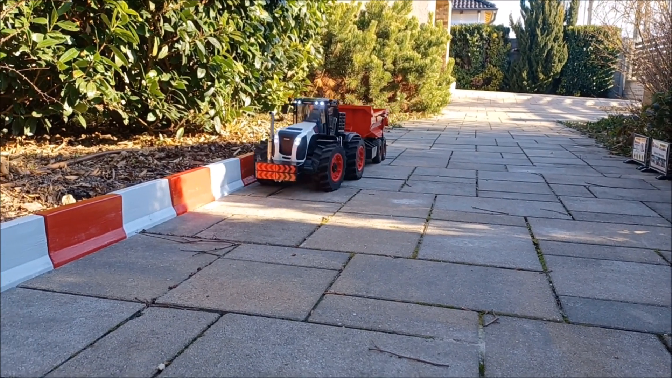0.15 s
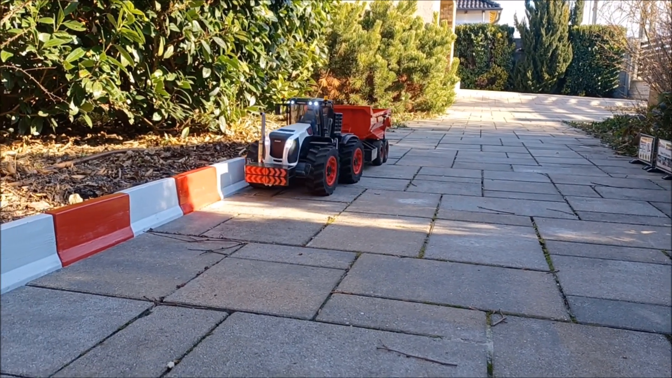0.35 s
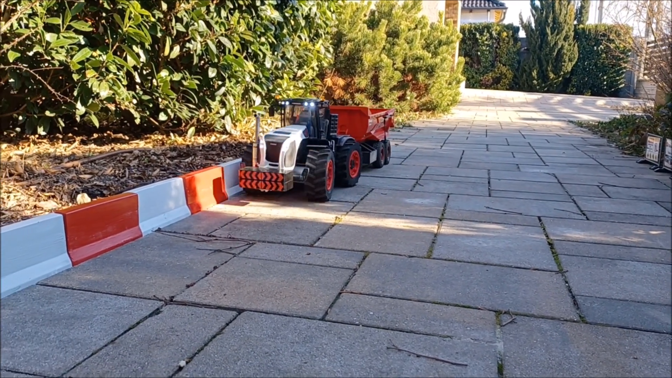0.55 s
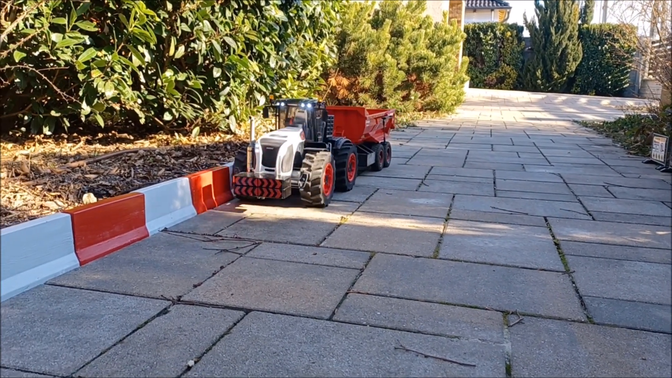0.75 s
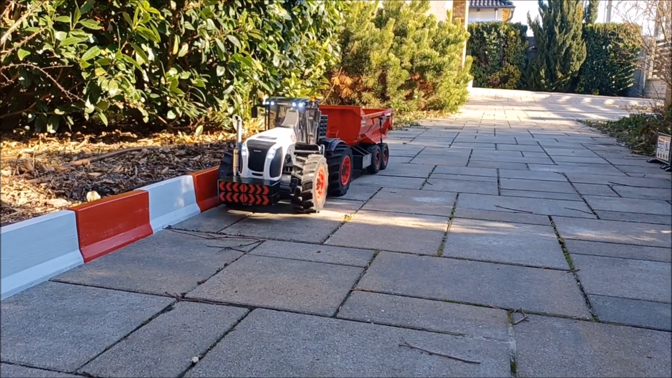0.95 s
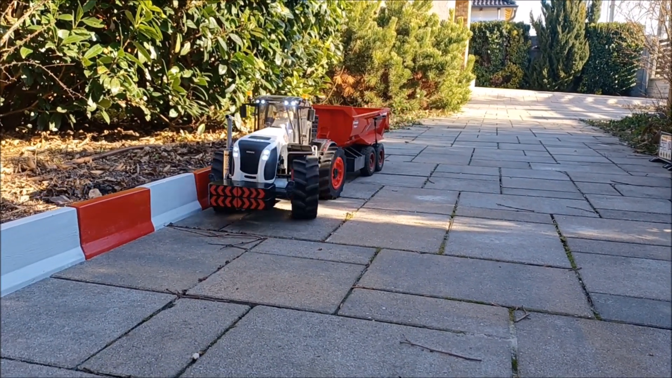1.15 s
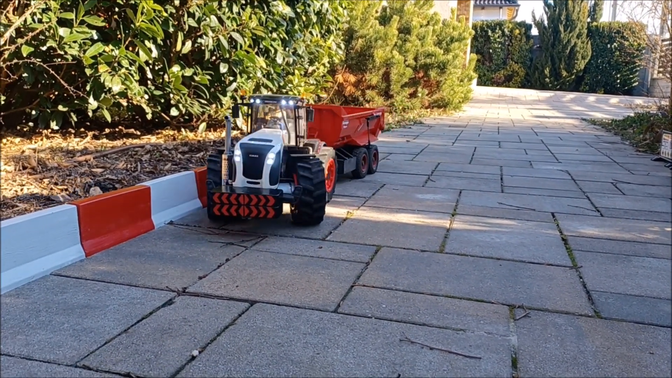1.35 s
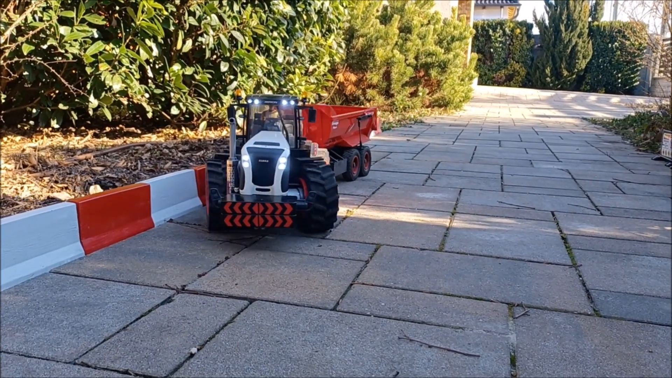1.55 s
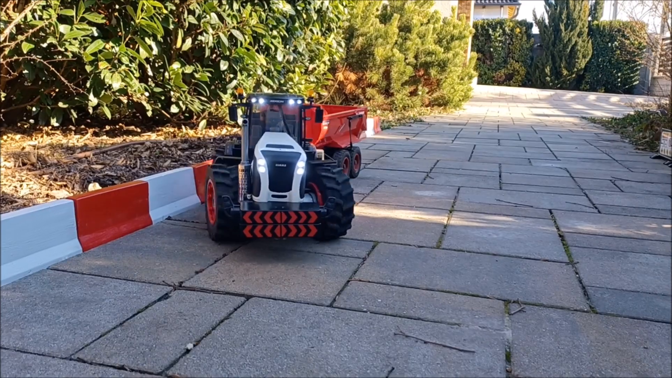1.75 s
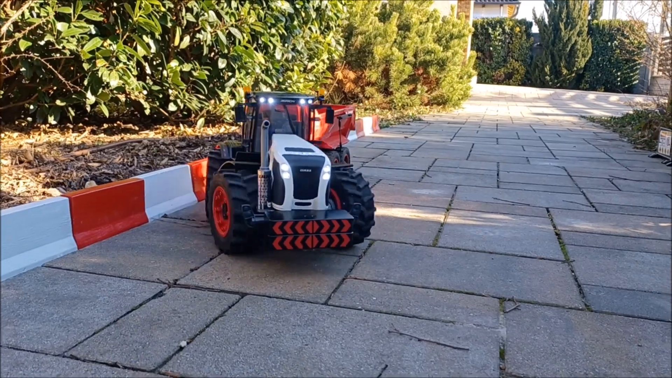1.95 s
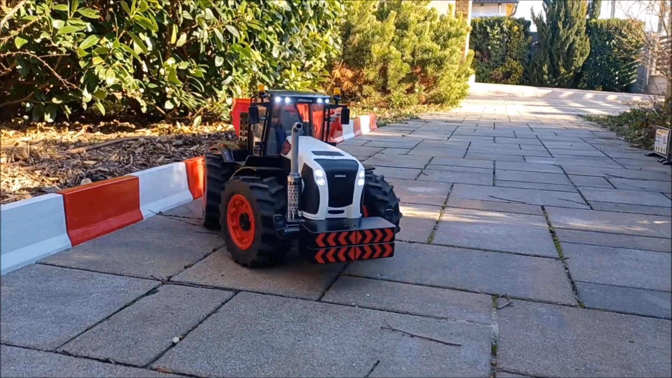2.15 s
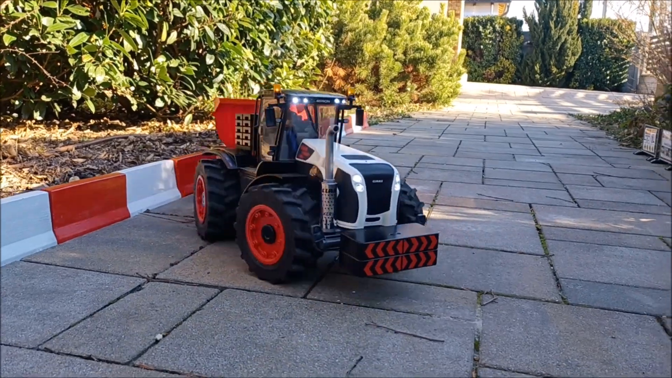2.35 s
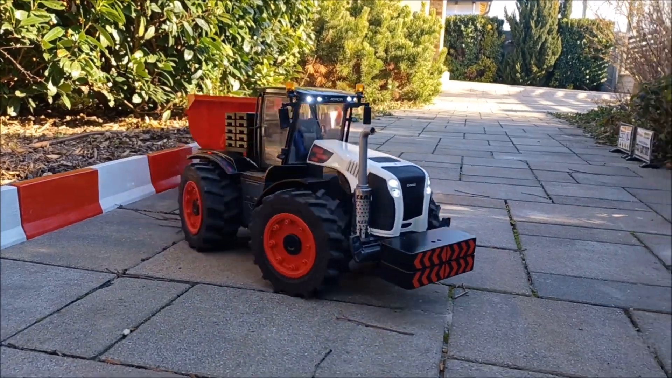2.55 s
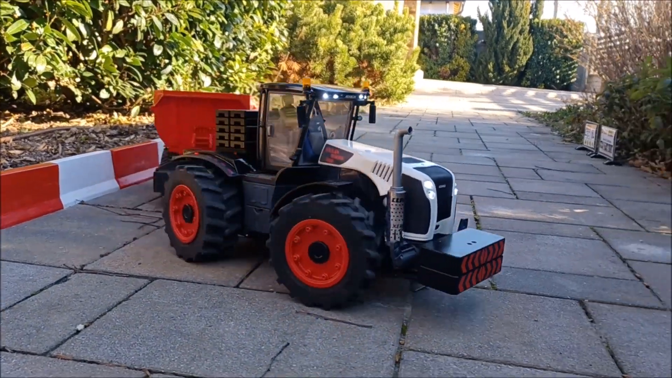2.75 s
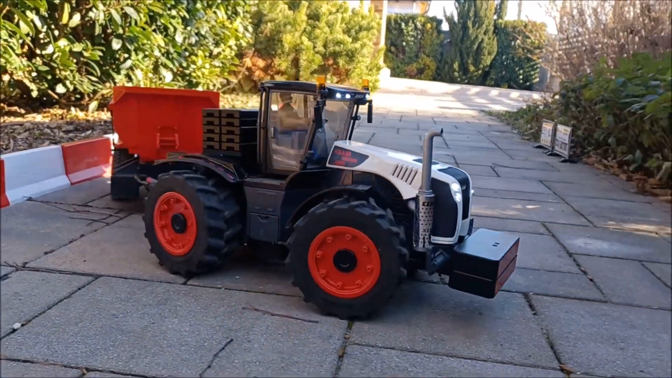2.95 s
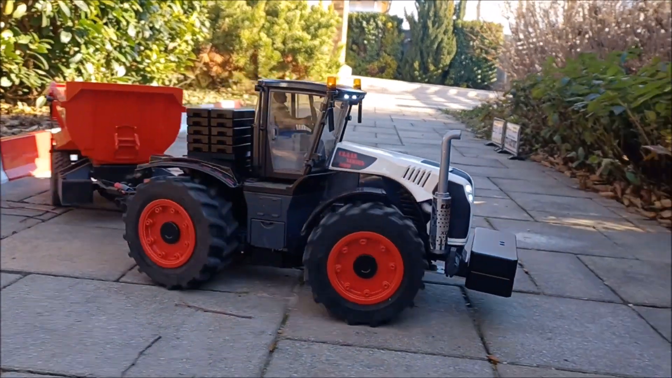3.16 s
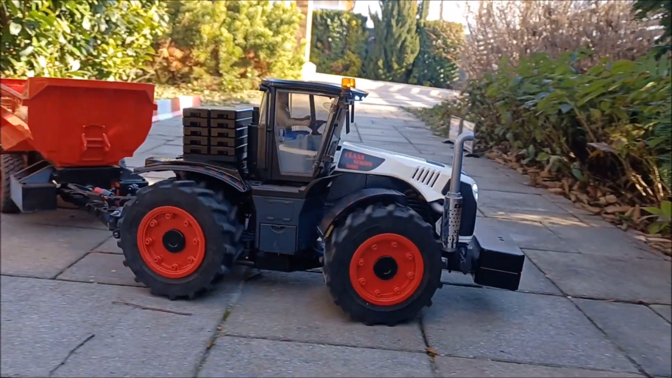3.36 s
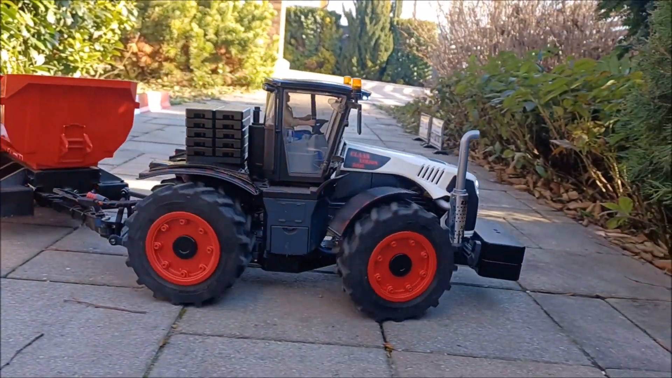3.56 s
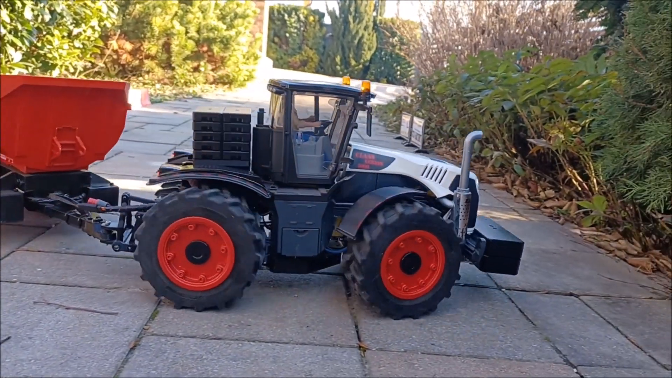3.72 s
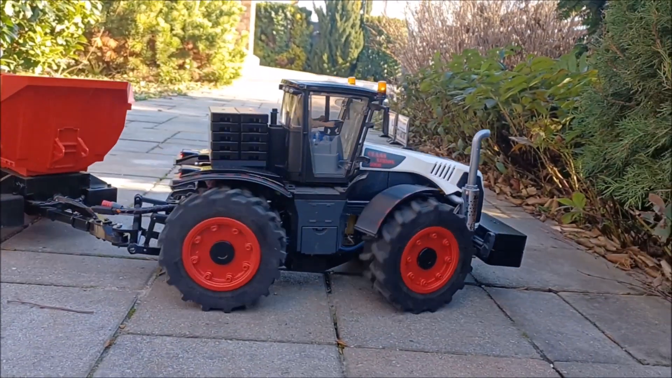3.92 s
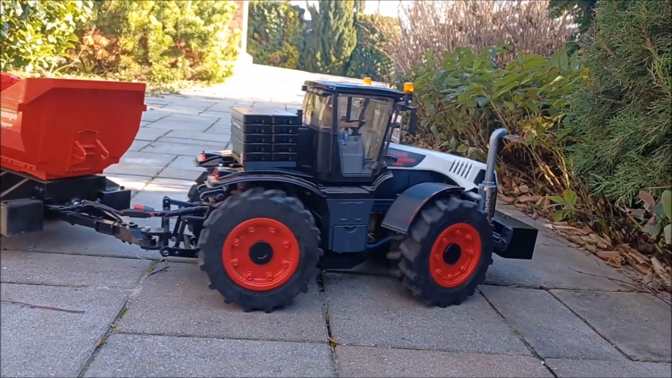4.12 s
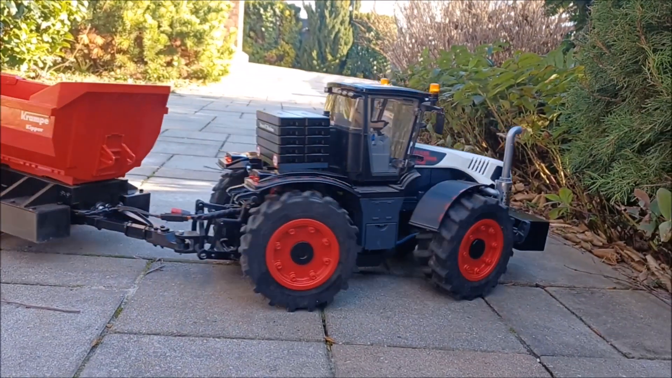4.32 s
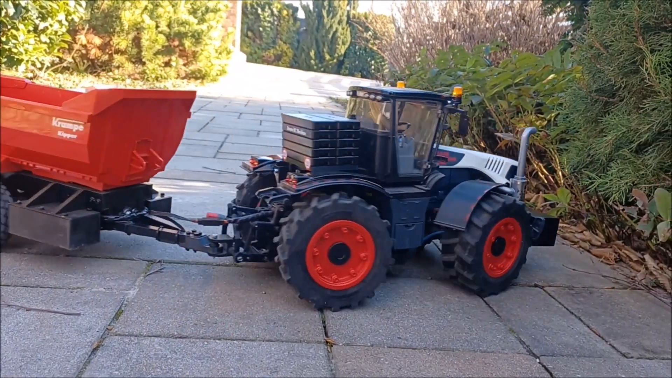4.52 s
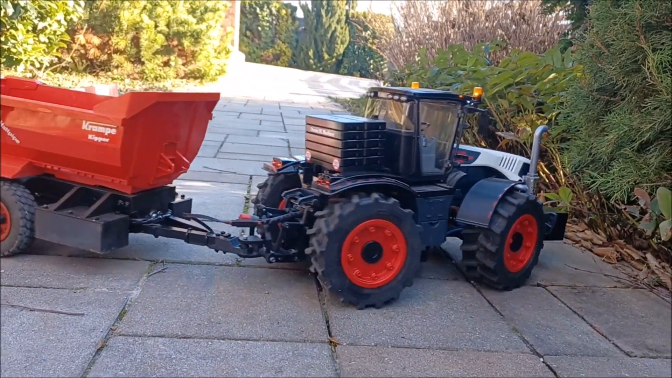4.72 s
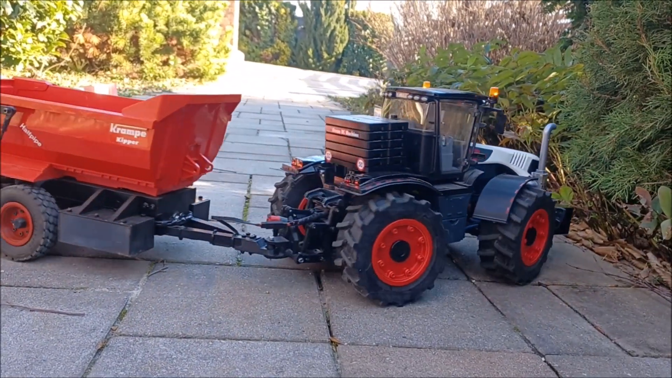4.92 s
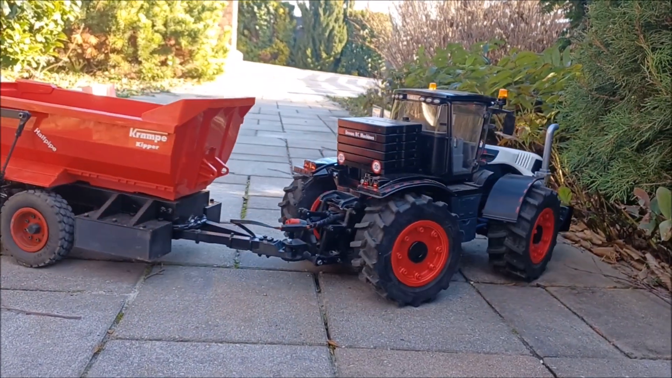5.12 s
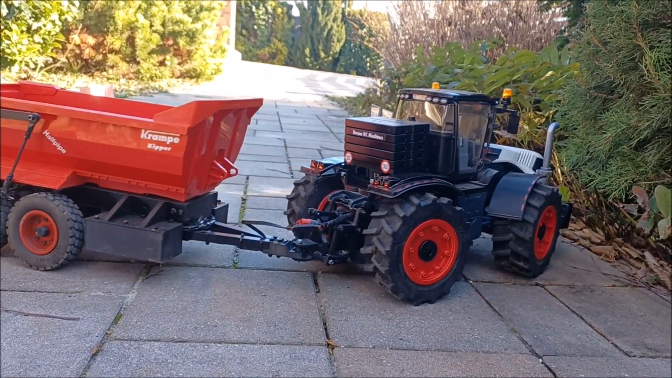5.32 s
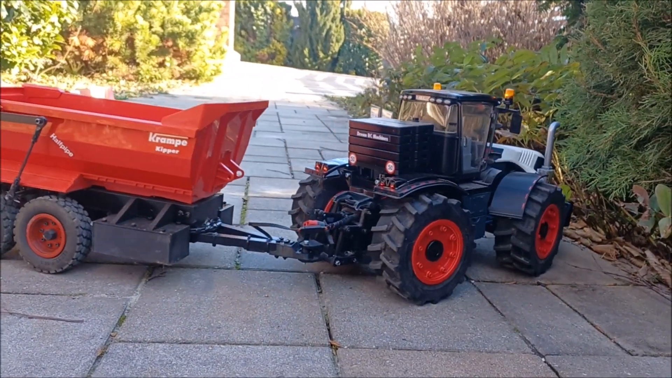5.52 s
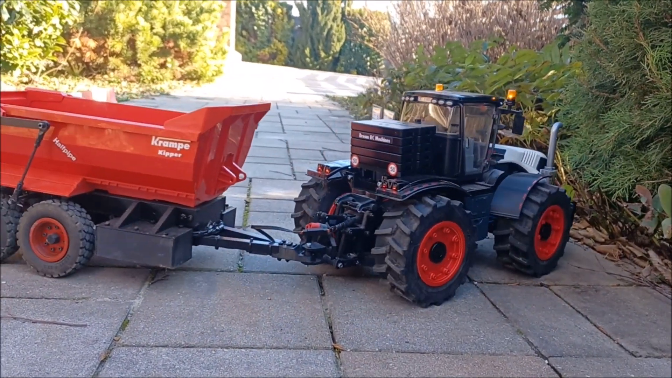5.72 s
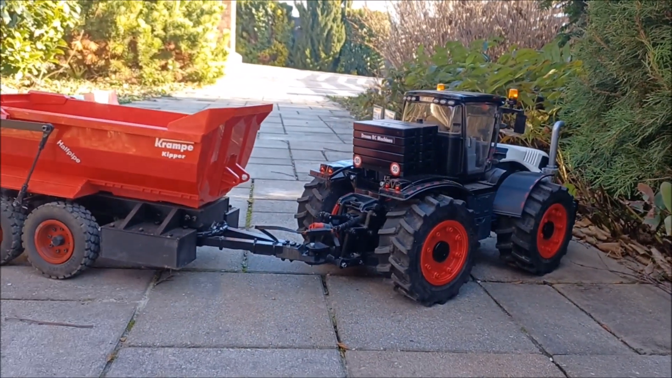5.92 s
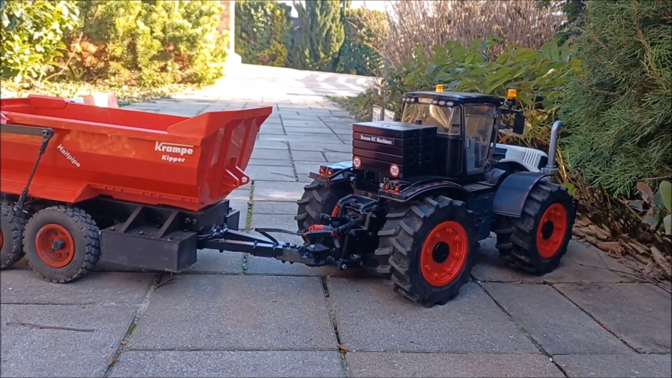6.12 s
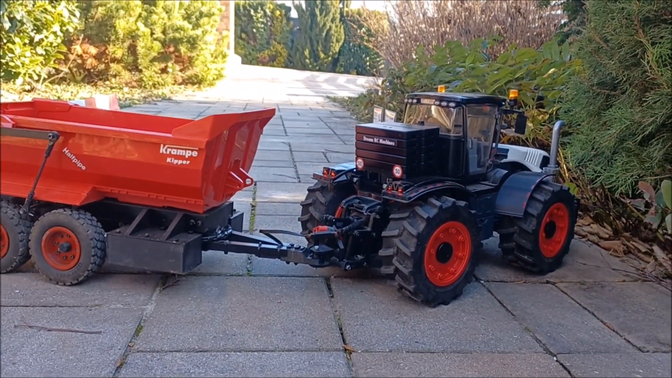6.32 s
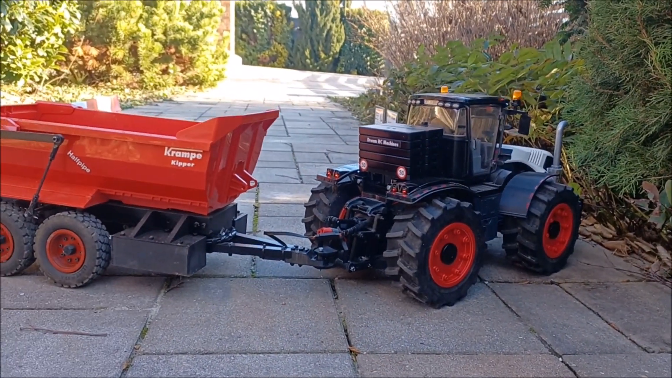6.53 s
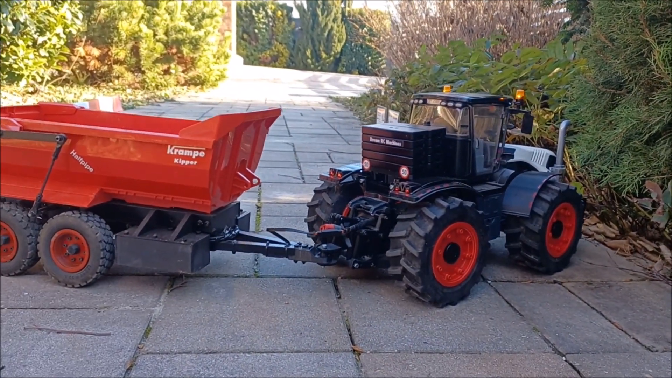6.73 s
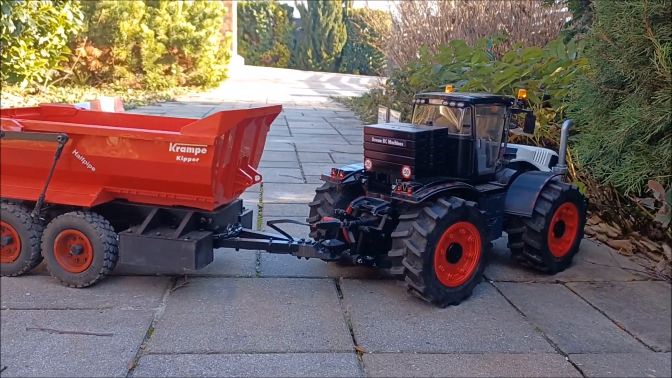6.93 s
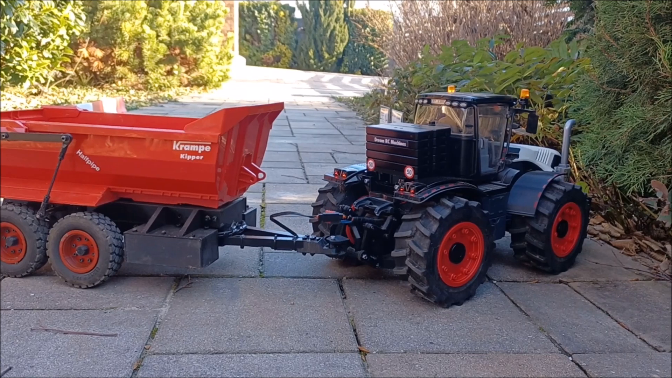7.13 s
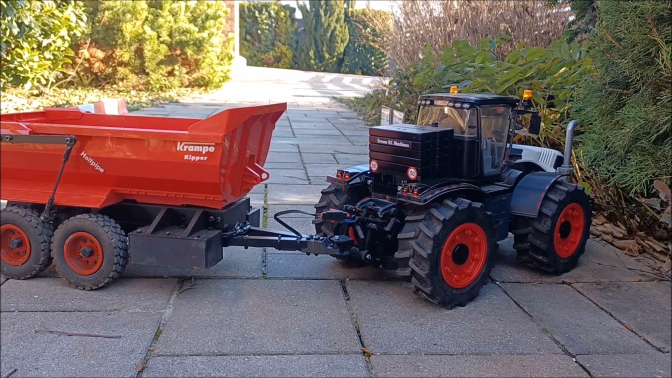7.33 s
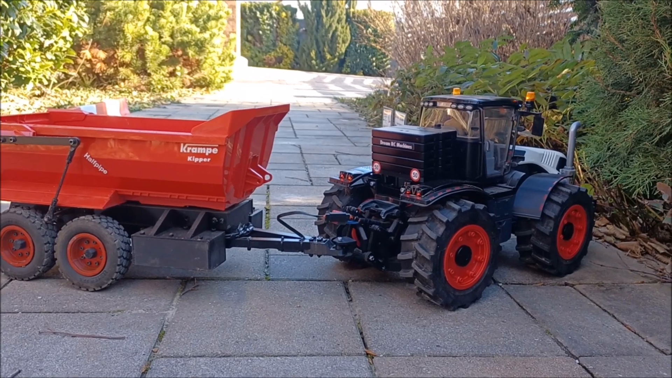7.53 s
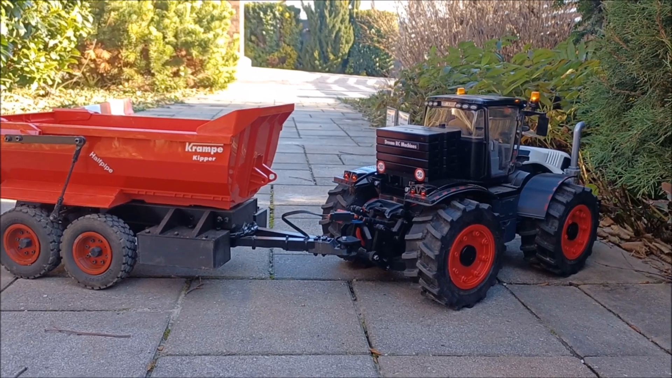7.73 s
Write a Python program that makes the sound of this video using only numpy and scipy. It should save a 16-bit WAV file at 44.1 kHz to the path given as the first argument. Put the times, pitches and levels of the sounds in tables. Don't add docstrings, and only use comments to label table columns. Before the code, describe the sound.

Close view of a small electric tractor: a bright, fluttering gear whine around three kilohertz and dry tooth rattle, swelling as it nears. From about three seconds it slows, pitch sliding down in steps, sand crackling sharply under the tyres. Slack hitch pins clack and the camera body is bumped in the hand. The gears creep briefly, a tiny servo whirs in short pushes, and only low distant traffic remains.

```python
import sys
import numpy as np
from scipy import signal
from scipy.fft import rfft, irfft, next_fast_len
from scipy.io import wavfile
from scipy.ndimage import uniform_filter1d, map_coordinates

SR = 44100
rng = np.random.default_rng(int(sys.argv[2]) if len(sys.argv) > 2 else 0)


def generate_wav(sig):
    pcm = np.round(np.clip(np.atleast_2d(sig).T, -1, 1) * 32767).astype(np.int16)
    wavfile.write(sys.argv[1], SR, pcm)


def invert_db(level):
    return 10 ** (np.asarray(level, dtype=float) / 20)


N = 342951

# time in seconds, front tooth rate in Hz.
FRONT_SPEED = [(0, 1650), (1.19, 1630), (1.225, 1603), (1.24, 1560), (1.275, 1534), (1.41, 1530),
               (1.45, 1520), (1.7, 1507), (1.92, 1514), (2.03, 1530), (2.08, 1511), (2.25, 1513),
               (2.3, 1530), (2.36, 1503), (2.43, 1530), (2.51, 1519), (2.64, 1523), (2.71, 1489),
               (2.8, 1496), (2.86, 1520), (3.12, 1510), (3.17, 1535), (3.215, 1515), (3.245, 1450),
               (3.29, 1388), (3.33, 1348), (3.365, 1235), (3.44, 1131), (3.5, 1062), (3.6, 912),
               (3.64, 850), (3.69, 815), (3.76, 772), (3.84, 788), (3.9, 762), (3.96, 786), (4.01, 775),
               (4.08, 797), (4.14, 770), (4.22, 793), (4.36, 790), (4.42, 708), (4.49, 697), (4.53, 650),
               (4.575, 595), (4.65, 588), (4.7, 562), (4.85, 567), (4.9, 550), (4.99, 503), (5.07, 425),
               (5.4, 378)]


def unit(x):
    return x / np.sqrt(np.mean(x ** 2) + 1e-20)


def along(points, hz):
    f, v = np.transpose(points)
    return np.interp(np.log(hz + 1), np.log(f + 1), v)


def curves(rows, outside=None):
    s, *cols = np.transpose(rows)
    return [np.interp(np.arange(N) / SR, s, c, outside, outside) for c in cols]


def bumps(rows):
    t = np.arange(N) / SR
    return sum(db * np.exp(-((t - s) / half) ** 2) for s, db, half in rows)


def wobble(rate, channels=1):
    at = [np.arange(N) * rate / SR]
    knots = rng.standard_normal((channels, int(N * rate / SR) + 4))
    return np.array([map_coordinates(k, at, order=1) for k in knots])


def filtered(x, response):
    m = next_fast_len(N + 8192)
    return irfft(rfft(x, m) * response(np.fft.rfftfreq(m, 1 / SR)), m)[..., :N]


def resonances(peaks, hz):
    return sum(db / (1 + ((hz - centre) / width) ** 2) for centre, width, db in peaks)


def coloured(spectrum):
    return lambda hz: invert_db(along(spectrum, hz))


def peaked(spectrum, peaks):
    return lambda hz: invert_db(along(spectrum, hz) + resonances(peaks, hz))


def rush(gain, patchy_db):
    # frequency in Hz, left-right likeness from 0 to 1.
    likeness = [(100, 0.67), (900, 0.71), (1500, 0.18), (2500, 0.074)]
    z = signal.stft(rng.standard_normal((2, N)), nperseg=512)[2]
    field = uniform_filter1d(rng.standard_normal(z.shape[1:]), size=4, axis=0)
    field = uniform_filter1d(field, size=8, axis=1)
    pair = signal.istft(z * invert_db(patchy_db * unit(field)), nperseg=512)[1][:, :N]
    angle = lambda hz: np.arccos(np.clip(along(likeness, hz), -1, 1)) / 2
    mid, side = filtered(pair, lambda hz: gain(hz) * [np.cos(angle(hz)), np.sin(angle(hz))])
    return unit(np.array([mid + side, mid - side]))


def background():
    # frequency in Hz, density in dB per Hz.
    hum_colour = [(15, -73), (25, -33), (107, -2), (140, -5.5), (432, -16.5), (580, -20), (719, -12.5),
                  (916, -17.5), (1170, -20), (1750, -23.5), (2000, -28), (3000, -33), (7000, -38),
                  (13800, -41), (15400, -21)]
    # frequency in Hz, level in dB rms.
    whistle_lines = [(15633, -82), (15676, -79)]
    # nearest time in seconds, half length in seconds, dB over the hum.
    tyre_roll = (2.9, 1.8, 7.4)
    # time in seconds, half length in seconds, dB over the hum.
    hand_shifts = [
        (5.518, 0.099, 13.5),
        (5.922, 0.18, 15),
    ]
    t = np.arange(N) / SR
    whistle = np.zeros((2, N))
    for hz, db in whistle_lines:
        phase = rng.uniform(0, 6, (2, 1))
        whistle += invert_db(db + 4 + wobble(8, channels=2)) * np.sin(2 * np.pi * hz * t + phase)
    swells_db = bumps([(s, db, half) for s, half, db in (tyre_roll, *hand_shifts)])
    hum_db = -71.5 + swells_db + wobble(11.0)
    return invert_db(hum_db) * rush(coloured(hum_colour), patchy_db=1.5) + whistle


def knocks():
    # time in seconds, peak in dB, pitch in Hz, left minus right in dB.
    shell_bumps = [(0.17, -46.5, 116.7, -10), (0.668, -50, 432, -10), (0.681, -44.5, 108, -6),
                   (0.837, -47.5, 290, -9), (0.922, -45.5, 286, -6), (1.051, -56.5, 658, -2),
                   (1.141, -46.5, 540, -7), (5.372, -52, 278, -12), (5.431, -48.5, 494, -12),
                   (5.452, -49, 200, -17), (5.483, -45, 252, -19), (5.56, -55, 297, -4),
                   (5.842, -54, 220, -14), (5.5, -35.5, 232, -18), (5.519, -36, 220, -8),
                   (5.529, -35, 290, -11), (5.538, -37, 270, -11), (5.781, -49, 161, -24),
                   (5.81, -48, 644, -13), (5.872, -42, 238, -26), (5.883, -47, 380, 16.5),
                   (5.893, -44, 484, -6), (5.92, -34, 195, -20), (5.9315, -22.5, 180, 30),
                   (5.932, -23.5, 160, -15), (5.944, -31, 190, -10), (5.89, -33.5, 104, -10),
                   (7.43, -54, 94, -5), (5.991, -53, 194, -15), (6.376, -55.5, 140, -12),
                   (6.46, -56.5, 197, -25), (6.5, -55.5, 262, -13), (7.412, -62.5, 236, -17),
                   (7.47, -71, 197, -9)]
    soft_t60_s, pitch_damps = 0.091, .35
    grip_db = 29
    out, t = np.zeros((2, N + SR)), np.arange(SR // 4) / SR
    for s, db, hz, pan_db in shell_bumps:
        t60 = soft_t60_s * 2 ** (-(db + 50.5) / grip_db) * (250 / hz) ** pitch_damps
        phase = rng.uniform(0, 1.1, (3, 2, 1))
        modes = zip((.55, 1, 1.6), (.4, 1, .25), phase)
        body = sum(g * np.sin(2 * np.pi * k * hz * t + p) for k, g, p in modes)
        rise = np.sin(np.pi / 2 * np.minimum(t * hz / 0.47, 1)) ** 2
        shade_db = np.minimum([[pan_db], [-pan_db]], 0)
        out[:, round(s * SR):][:, :len(t)] += invert_db(db + 10.0 - 60 * t / t60 + shade_db) * rise * body
    return filtered(out[:, :N], lambda hz: (1j * hz / (70 + 1j * hz)) ** 4)


def grit():
    # time in seconds, peak in dB, length in seconds.
    ticks = [(.82, -49.5, .022), (.9, -53.5, .022), (3.54, -40, .07), (3.636, -38, .07), (3.725, -41, .045),
             (3.8082, -39, .022), (3.9664, -46, .04), (4.188, -37, .055), (4.245, -46, .04),
             (4.3582, -42, .04), (4.4443, -42, .02), (4.5772, -33, .022), (4.657, -32.5, .022),
             (4.6694, -34.5, .022), (4.683, -42, .018), (4.745, -39, .018), (4.8332, -42.5, .018),
             (4.9199, -33, .022)]
    # frequency in Hz, density in dB per Hz.
    grit_colour = [(1800, -17.5), (4000, 8), (6500, 4.5), (8500, -8), (11000, 5), (15800, -5)]
    envelope, t = np.zeros(N + SR), np.arange(SR // 10) / SR
    for s, db, length in ticks:
        fall = invert_db(db - 3.0 - 60 * (t / length) ** 2)
        envelope[round(s * SR):][:len(t)] += fall * (1 - np.exp(-t / 0.0013))
    return envelope[:N] * rush(coloured(grit_colour), patchy_db=1.2)


def hitch():
    # time in seconds, peak in dB, resonance in Hz, left minus right in dB.
    clacks = [(5.351, -30.5, 3900, 1), (5.428, -28.5, 3000, -3), (5.4269, -36, 1230, -16),
              (5.7762, -35, 2920, -4), (5.811, -26.5, 2040, -3), (5.8383, -34.5, 4310, -10.5),
              (5.8564, -36, 4550, -15), (5.8829, -30, 2510, -2.5), (5.8882, -24.5, 1140, -8.5),
              (6.518, -49, 5500, -9), (6.5182, -54, 2400, 0), (6.5181, -49, 14500, 0),
              (6.495, -58, 3980, 0)]
    t60_s = 0.026
    edge_db, edge_grows = -33.5, 0.46
    pin_db = -3.5
    out, t = np.zeros((2, N + SR)), np.arange(SR // 10) / SR
    f = np.fft.rfftfreq(len(t), 1 / SR)
    for s, db, hz, pan_db in clacks:
        treble_db = edge_db - (1 - edge_grows) * (db + 36.5)
        resonance = 1 / (1 + ((f - hz) / (0.27 * hz)) ** 2) + 0.14
        band = (f > 500) / (1 + (f / max(6500, 0.87 * hz)) ** 8)
        colour = resonance * band + invert_db(treble_db + 1.5) * (f > 6500)
        burst = unit(irfft(rfft(rng.standard_normal((2, len(t)))) * colour, len(t)))
        burst = burst + invert_db(pin_db) * np.sin(2 * np.pi * hz * t)
        fall_db = 60 * t / t60_s * (hz / 2000) ** 0.25
        envelope = invert_db(db - 9 - fall_db + [[pan_db / 2], [-pan_db / 2]]) * (1 - np.exp(-t / 0.00057))
        out[:, round(s * SR):][:, :len(t)] += envelope * burst
    return out[:, :N]


def first_turn():
    # start in seconds, end in seconds, start level in dB, end level in dB.
    steer = [
        (5.35, 5.37, -64, -70),
        (5.397, 5.48, -53, -57),
        (5.502, 5.698, -53, -47.5),
    ]
    # frequency in Hz, density in dB per Hz.
    steer_colour = [(530, -56), (900, -17), (1010, -50), (1290, -16.5), (1870, -52), (2240, -9.5),
                    (2430, -19), (2780, -9.5), (3170, 1), (4130, -16), (5310, -12), (8570, -17.5),
                    (10000, -12.5), (11200, -25), (15800, -29.5)]
    # frequency in Hz, width in Hz, height in dB.
    steer_peaks = [(5500, 130, 8), (6500, 440, 7.5), (9950, 400, 8), (12500, 790, 13)]
    t = np.arange(N) / SR
    turn = np.zeros(N)
    for a, b, db_a, db_b in steer:
        stop_db = 344 * np.maximum(t - b, 0)
        turn += (t > a) * invert_db(np.interp(t, [a, b], [db_a, db_b]) - stop_db)
    return uniform_filter1d(turn, size=900) * rush(peaked(steer_colour, steer_peaks), patchy_db=2.0)


def second_turn():
    # start in seconds, end in seconds, start level in dB, end level in dB.
    strokes = [
        (6.724, 6.919, -47.5, -46),
        (6.941, 7.004, -48, -51.5),
        (7.009, 7.103, -51, -52.5),
        (7.129, 7.183, -52, -64.5),
        (7.193, 7.24, -55.5, -75.5),
    ]
    # frequency in Hz, density in dB per Hz.
    stroke_colour = [(290, -30.5), (500, -27.5), (578, -51.5), (697, -17.5), (817, -19), (1480, -17),
                     (1680, -16.5), (2150, -2), (3780, -10.5), (4240, -6.5), (5830, -14.5), (6360, -16.5),
                     (8610, -18.5), (12000, -6.5), (15800, -19)]
    # frequency in Hz, width in Hz, height in dB.
    servo_peaks = [(2260, 190, -4.5), (4520, 150, 4.5), (6450, 330, 10.5), (12300, 200, -5.5)]
    # frequency in Hz, level in dB over the whir.
    pinion = [(2130, -14.5), (4250, -8), (6380, -15.5)]
    beat_hz, beat_db, grain_db = 70, 4, 2
    t = np.arange(N) / SR
    pushes = np.zeros(N)
    for a, b, db_a, db_b in strokes:
        pushes += (t > a) * (t < b) * invert_db(np.interp(t, [a, b], [db_a, db_b]))
    coast = invert_db(np.interp(t, [6.7, 6.722, 7.2, 7.255, 7.285], [-79.0, -62, -68.0, -72.5, -99.5]))
    envelope = uniform_filter1d(pushes, size=90) + coast
    turns = 2 * np.pi * np.cumsum(1 + 0.014 * wobble(35)[0]) / SR
    sing = sum(invert_db(db + 3.9 * wobble(40, channels=2)) * np.sin(hz * turns) for hz, db in pinion)
    beat = np.cumsum(beat_hz * (1 + .15 * wobble(40)[0])) / SR % 1
    catching = unit(invert_db(-beat_db * beat + grain_db * wobble(400)))
    return envelope * catching * (rush(peaked(stroke_colour, servo_peaks), patchy_db=2.0) + sing)


def servo():
    # time in seconds, pitch in Hz, length in seconds, level in dB.
    squeaks = [
        (5.385, 1250, .035, -68),
        (7.098, 2700, 0.012, -55),
        (7.165, 2700, 0.019, -55),
        (7.21, 4100, .015, -69),
        (6.82, 2150, 0.014, -48),
        (7.075, 790, .015, -72),
        (7.215, 730, .03, -70),
        (7.445, 980, .02, -75),
        (7.6, 750, .03, -76),
    ]
    t = np.arange(N) / SR
    squeal = np.zeros(N)
    for s, hz, length, db in squeaks:
        squeal += invert_db(db) * np.exp(-((t - s) / length) ** 2) * np.sin(2 * np.pi * hz * t)
    return invert_db(2.5) * (first_turn() + second_turn() + squeal) * invert_db(0.62 * np.tanh(wobble(130)))


def creeping():
    # start, fastest and end time in seconds, peak in dB, rise in dB, sag in dB.
    creeps = [
        (5.8, 6.2, 6.39, -50, 18, 10),
        (7.38, 7.425, 7.47, -73, 9, 10),
    ]
    total = np.zeros(N)
    for a, top, b, db, rise_db, sag_db in creeps:
        stopped_db = db - sag_db - 35
        rows = [(a, db - rise_db), (top, db), (b, db - sag_db), (b + 0.03, stopped_db)]
        total += invert_db(curves(rows, outside=-120)[0])
    return total


def stopping():
    # frequency in Hz, density in dB per Hz.
    creep_colour = [(240, -22.5), (400, -18), (890, -9.5), (1140, -4.5), (1700, -10), (2350, -4.5),
                    (3090, -1), (3900, -5.5), (5220, -10.5), (7910, -23), (10400, -19.5), (14000, -30.5),
                    (15800, -23)]
    # frequency in Hz, width in Hz, height in dB.
    creep_peaks = [(1100, 150, 2), (2350, 120, 3), (3050, 200, 2), (5150, 200, 4)]
    # time in seconds, level in dB.
    settle = [(6.38, -95), (6.41, -74), (6.44, -76), (6.454, -64), (6.48, -74), (6.52, -77), (6.6, -79),
              (6.645, -76), (6.7, -82), (7.22, -82), (7.27, -76), (7.33, -79), (7.5, -88), (7.56, -100)]
    # frequency in Hz, density in dB per Hz.
    settle_colour = [(600, -30), (850, -8), (1200, -12), (1900, -11), (2400, -2), (3100, 0), (3900, -14),
                     (5000, -6), (7000, -18), (15800, -35)]
    creep = creeping() * rush(peaked(creep_colour, creep_peaks), patchy_db=1.5)
    settle_gain = invert_db(curves(settle, outside=-120)[0] - 5)
    return invert_db(5.5) * (creep + settle_gain * rush(coloured(settle_colour), patchy_db=2.5))


def switching():
    carrier = (8008, 4.75, 5.34, -76)
    hz, start, end, db = carrier
    t = np.arange(N) / SR
    gain = invert_db(db + 2.5 * wobble(20, channels=2))
    return gain * (t > start) * (t < end) * np.sin(2 * np.pi * hz * t)


def shafts():
    # time in seconds, rear tooth rate in Hz.
    rear_speed = [(0, 1902), (1.19, 1885), (1.25, 1800), (1.31, 1770), (1.45, 1750), (3.2, 1746),
                  (3.37, 1480), (3.5, 1260), (3.6, 1090), (3.7, 975), (3.78, 946), (4.38, 946), (4.45, 870),
                  (4.5, 800), (4.57, 730), (4.69, 700), (4.89, 700), (4.95, 650), (5.05, 566), (5.4, 460)]
    turn_s = (3.25, 3.6)
    axle_share = (.347, .4)
    (front,), (rear,) = curves(FRONT_SPEED), curves(rear_speed)
    return np.array([front, rear, rear * np.interp(np.arange(N) / SR, turn_s, axle_share)])


def whine(pan_db, swell_db):
    # shaft number, multiple of its tooth rate, dB at full speed, dB gained at half speed.
    meshes = [(0, .346, -9, -30), (0, .6, -10, -20), (0, .7, -8, -20), (0, 1, -5, -15), (0, 1.4, -7, -15),
              (0, 1.6, -15, -10), (0, 1.7, -18, -10), (0, 1.8, -17, -10), (0, 1.9, -16, -20),
              (0, 1.966, -11, -30), (0, 2, 0, -4), (0, 2.035, -15, -30), (0, 3, 1, -2), (0, 4, -11, 9),
              (0, 5, -16, 14), (0, 6, -17, 9), (0, 7, -5, -12), (1, 1, -8, 6), (1, 2, -14, 11),
              (1, 3, -13, 8), (1, 4, -10, 4), (2, 1, -12, 4)]
    # frequency in Hz, gain in dB.
    casing = [(300, -30), (380, -11), (470, -24), (610, -19), (740, -28), (950, -14), (1450, -10),
              (1600, -22), (1900, -13), (2100, -16), (2350, -6), (2900, 0), (3230, 0), (3340, -14),
              (3520, -15), (3750, -22), (4100, -26), (4500, -24), (5500, -25), (7000, -18), (8000, -24),
              (10600, -19)]
    hunting = .0014
    fading_db, breakup_db = 1.8, 3.5
    rates = shafts()
    unsteady = hunting * wobble(9, channels=3) * FRONT_SPEED[0][1] / rates[0]
    speeds = rates * (1 + 0.0012 * wobble(30, channels=3) + unsteady)
    turns = 2 * np.pi * np.cumsum(speeds, axis=1) / SR
    bearing = np.interp(np.arange(N) / SR, [2.5, 2.7], [.2, -.6]) * [[1], [-1]]
    tones, power = np.zeros((2, N)), np.zeros(N)
    for shaft, multiple, db, slow_db in meshes:
        rate = speeds[round(shaft)]
        hz = multiple * rate
        halvings = np.log2(rate.max() / rate)
        gain = invert_db(db + (slow_db + fading_db * wobble(18)[0]) * halvings + along(casing, hz))
        flutter_db = (2.5 + .3 * multiple) * (1 if shaft == 0 else .6)
        backlash = np.tanh(.5 * (wobble(70) + 0.15 * wobble(14, channels=2)))
        shake = unit(invert_db(flutter_db * 2 * backlash))
        path = bearing + .3 * wobble(4, channels=2) + .25 * wobble(60)
        away = 1 - 1 / (1 + ((hz - 2900) / 700) ** 4)
        breakup = invert_db(away * (breakup_db * wobble(14)[0] - 0.6 * swell_db))
        tones += gain * breakup * shake * np.sin(multiple * turns[round(shaft)] + path)
        power += gain ** 2 / 2
    return tones / np.sqrt(power) * invert_db([pan_db / 2, -pan_db / 2])


def rattle(slow):
    # frequency in Hz, density in dB per Hz.
    gears = [(150, -61.5), (250, -30), (373, -21.5), (436, -24.5), (934, -9.5), (1090, -14.5), (1190, -9),
             (1710, -12.5), (3040, 8), (3550, -13), (5300, -19.5), (8610, -27), (10200, -20.5),
             (15800, -36)]
    # frequency in Hz, density in dB per Hz.
    slow_gears = [(180, -59), (300, -32.5), (582, -33), (735, -28), (1250, -15.5), (1660, -35.5), (2820, 2),
                  (3920, -20), (10400, -39), (12700, -38), (15800, -52)]
    fast_noise = np.sqrt(1 - slow) * rush(coloured(gears), patchy_db=1.6)
    slow_noise = np.sqrt(slow) * rush(coloured(slow_gears), patchy_db=3)
    return (fast_noise + slow_noise) * invert_db(1.0 * wobble(90))


def drive():
    # time in seconds, gear noise in dB, brightness in dB.
    view = [(0, -57, -1.5), (.58, -57, -0.5), (.68, -53, 0), (.98, -56.5, -3.5), (1.07, -56, 5.5),
            (1.2, -53, 2), (1.9, -52.5, 2.5), (2.3, -49, 3), (2.76, -51, 5), (2.88, -48.5, 3),
            (3.15, -48.5, 5.5), (3.48, -47.5, 2), (3.68, -51, 2.5), (4.35, -52, 0), (4.9, -53.5, -4),
            (5.03, -57, -2), (5.32, -66, -2.5), (5.41, -68, 1.5)]
    # front tooth rate in Hz, gain in dB.
    singing = [(378, -21), (500, 12), (570, 12), (785, 15), (1000, 11), (1300, 12.5), (1500, 18.5),
               (1585, 15), (1602, -2)]
    # time in seconds, gain in dB, half length in seconds.
    swells = [(.65, 15.5, 0.021), (.78, 12, 0.046), (1.17, 15.5, 0.023), (1.245, 6, 0.015),
              (1.29, 3, 0.035), (1.47, 4.5, 0.044), (1.33, 6.5, 0.12), (1.6, 5, 0.29), (1.82, 9.5, 0.047),
              (2.0, 10, 0.037), (2.065, 11, 0.019), (2.1, 7, .01), (2.16, 10, 0.059), (2.74, 10, 0.12),
              (2.87, -7.5, 0.039), (2.98, 7, 0.021), (3.07, 6.5, 0.049), (3.24, 7, 0.019),
              (3.355, 9, 0.022), (3.42, 0.5, 0.039), (3.51, 9, 0.045), (3.67, 3, .03), (4.19, -2, 0.035),
              (3.61, 2.5, 0.041), (4.05, 1, .08), (4.27, -1.5, .04), (4.41, 5, .03), (4.49, 2, 0.055),
              (4.56, 2.5, 0.017), (4.91, 4, 0.032), (4.76, 4.5, .05), (4.85, 3, 0.032), (4.97, -0.5, 0.089)]
    # time in seconds, left minus right in dB.
    beam = [(0, -25), (1.2, 1), (1.3, 0), (1.62, 12.5), (1.76, 9.5), (1.95, -12), (2.15, 5), (2.5, -5.5),
            (3.14, 10), (3.3, -3.5), (3.6, 4), (3.68, 2), (4.3, 2.5), (4.85, 4), (5.4, 3)]
    noise_db, bright_db = curves(view, outside=-120)
    (front,), (pan_db,), swell_db = curves(FRONT_SPEED), curves(beam), bumps(swells)
    whine_db = noise_db + along(singing, front) + swell_db
    casing_db = -2 + 15.5 * np.log2(front.max() / front) + 0.35 * swell_db
    slow = np.clip((820 - front) / 330, 0, 1)
    noise = rattle(slow)
    low = filtered(noise, lambda hz: 1 / (1 + (hz / 2150) ** 12))
    high = filtered(noise, lambda hz: 1 - 1 / (1 + (hz / 3700) ** 12))
    ring = unit(noise - low - high)
    ceiling_db = np.maximum(whine_db - 6, noise_db + 2 + 10 * slow ** 4)
    ring_db = np.minimum(noise_db + casing_db + 5, ceiling_db)
    gear_noise = invert_db(noise_db + 2.5) * (unit(low) + invert_db(bright_db + 2.0) * unit(high))
    gear_noise = gear_noise + invert_db(ring_db) * ring
    tones = invert_db(whine_db - 6.0) * whine(np.clip(pan_db, -20, 20), swell_db)
    return gear_noise + tones + stopping() + switching()


def scene():
    # frequency in Hz, left minus right in dB.
    port_balance = [(300, -1.5), (1100, -3), (3100, -1.5), (4300, 3.5), (5100, 9), (5900, 8), (7300, 9.5),
                    (8600, 7.5), (10300, 5.5), (12000, -11.5), (13400, -10), (14500, 12.5)]
    # frequency in Hz, width in Hz, gain in dB.
    cavity = [(3820, 180, -7.5), (5200, 200, 3.5), (8900, 600, -10)]
    tractor = grit() + hitch() + servo() + drive()
    side = np.array([[.5], [-.5]])
    lag_s = .00009

    def ports(hz):
        gain = invert_db(side * along(port_balance, hz) + resonances(cavity, hz))
        return gain * np.exp(2j * np.pi * hz * side * lag_s)

    return background() + knocks() + filtered(tractor, ports)


def roll_off(x):
    return signal.sosfilt(signal.butter(12, 16450, fs=SR, output="sos"), x)


def record(dry):
    mix = filtered(dry, lambda hz: hz < 15850)
    return roll_off(mix)


dry = scene()
out = record(dry)
generate_wav(out)
```